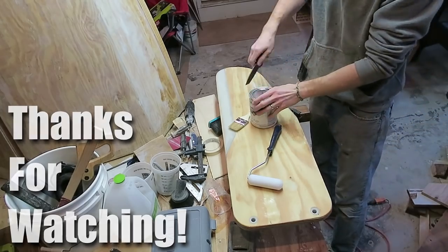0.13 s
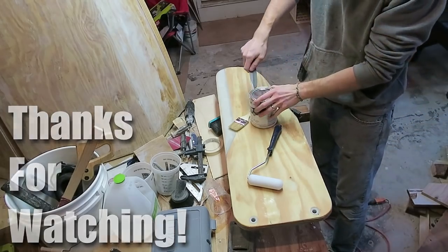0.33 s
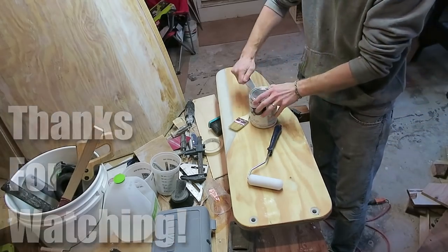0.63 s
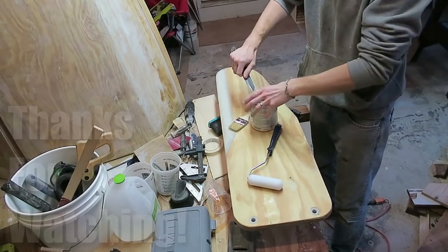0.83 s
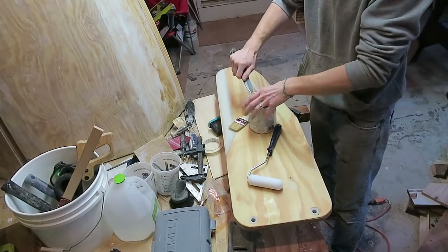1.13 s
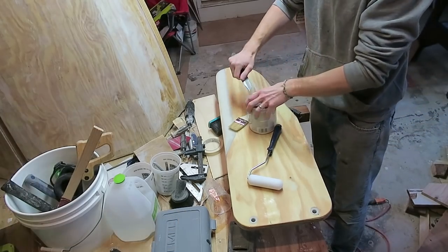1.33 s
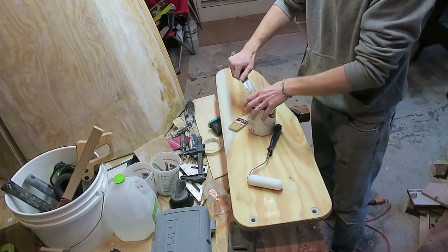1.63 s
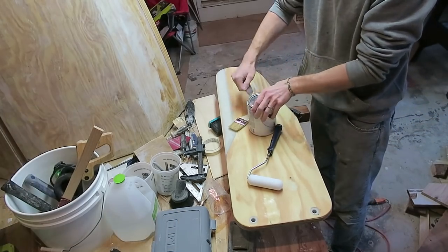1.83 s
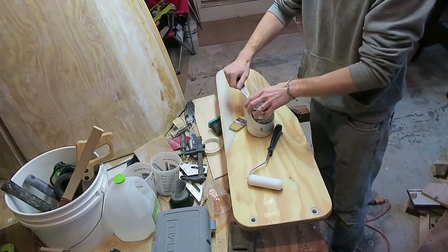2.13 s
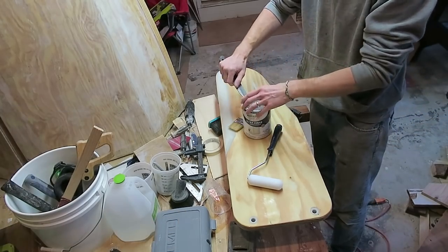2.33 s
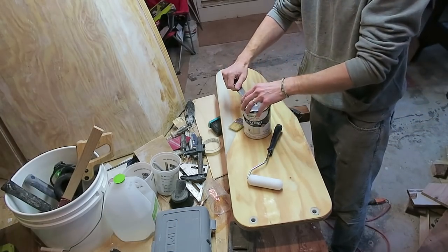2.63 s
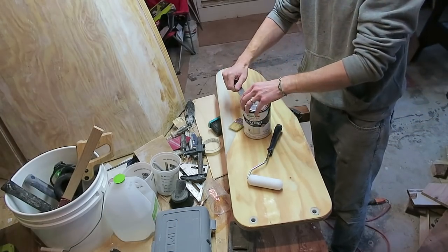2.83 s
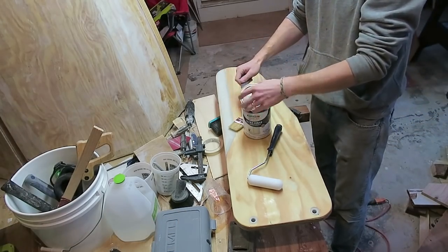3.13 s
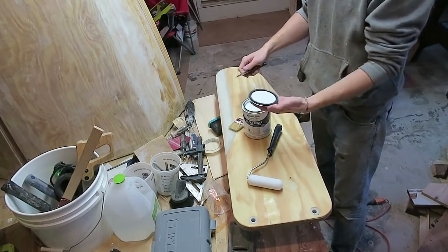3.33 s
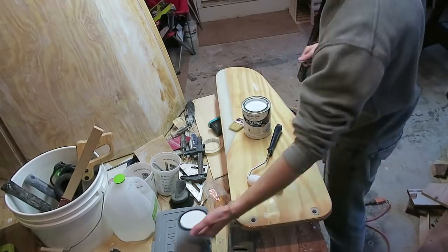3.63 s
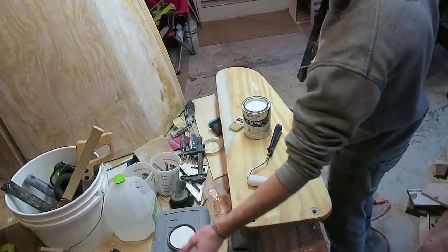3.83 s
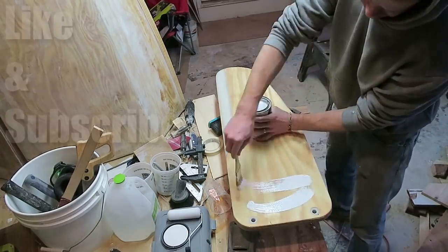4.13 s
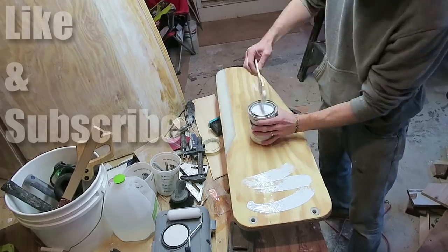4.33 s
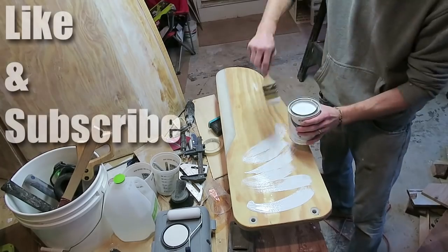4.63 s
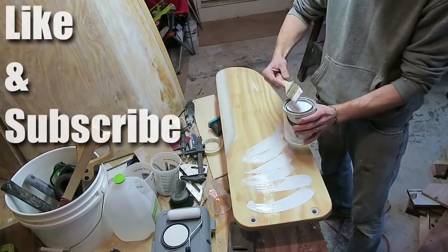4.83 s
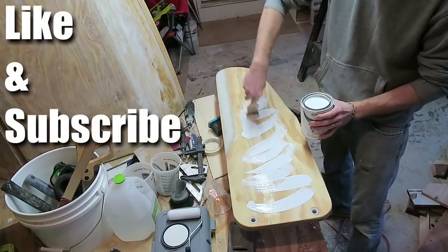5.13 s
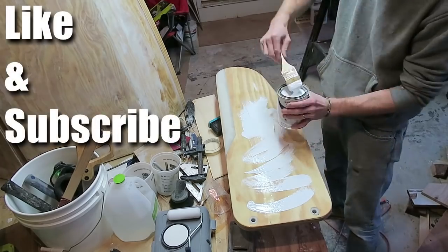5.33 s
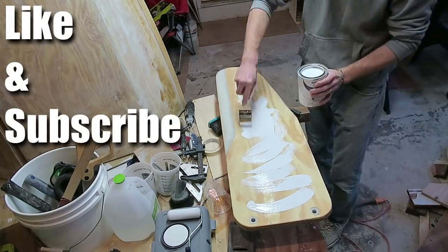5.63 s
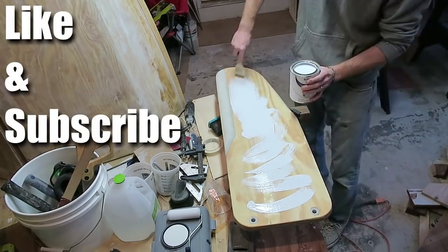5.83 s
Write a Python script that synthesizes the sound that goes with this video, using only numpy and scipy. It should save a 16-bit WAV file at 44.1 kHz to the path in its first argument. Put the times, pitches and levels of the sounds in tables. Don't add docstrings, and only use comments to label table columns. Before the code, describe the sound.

In a small workshop, a steel blade works round a paint tin on a plywood bench, sped up so the knocks swell softly, with squeaks and rasps. After a quieter gap the lid drops on a plastic case with a very loud crack, bounces and rings briefly. A cut, then faint brushing. Close stereo microphone, low room noise and thin high whine.

```python
import sys
import numpy as np
from scipy import signal
from scipy.fft import rfft, irfft, next_fast_len
from scipy.io import wavfile
from scipy.ndimage import uniform_filter1d

SR = 44100
rng = np.random.default_rng(int(sys.argv[2]) if len(sys.argv) > 2 else 0)


def log_audio(samples):
    frames = np.atleast_2d(samples).T
    limited = np.clip(frames, -1, 1)
    pcm = np.round(limited * 32767).astype(np.int16)
    wavfile.write(sys.argv[1], SR, pcm)


def gain_from_db(level_db):
    decades = np.asarray(level_db, float) / 20
    return 10 ** decades


N = 263256
PAD = next_fast_len(N + SR)

# start_s, blade_db, rim_db, tip_db, favoured_rim_hz
PRISES = [(0.187, -49, -61, -62.5, 3710), (0.417, -44, -62, -54.5, 3720), (0.903, -36.5, -70, -81, 3700),
          (0.997, -44, -51.5, -63, 3800), (1.169, -48.5, -52.5, -67, 3580),
          (1.305, -37.5, -41.5, -49.5, 3830), (1.572, -41, -52, -59, 3800),
          (1.738, -53.5, -61, -72.5, 3420), (1.87, -38.5, -37.5, -47, 3785), (1.964, -51.5, -68, -76, 3290),
          (2.042, -54, -42, -58.5, 3760), (2.137, -61, -57, -69, 3690), (2.171, -71, -64, -73, 3300),
          (2.222, -64, -59.5, -71, 3170), (2.297, -56, -51.5, -66, 3530), (2.37, -57, -54, -66, 3720),
          (2.431, -52, -45.5, -58.5, 3660), (2.481, -60, -42.5, -47.5, 3850),
          (5.907, -49, -69, -66.5, 3800)]
# start_s, case_db, lid_ring_db, crack_db, contact_hz
LANDINGS = [
    (3.8335, -3.5, -24, -5, 14000),
    (3.8368, -16, -24, -32, 7000),
    (3.9342, -14, -22, -24, 9000),
    (3.935, -7.5, -22, -22, 9000),
    (3.939, -26, -15, -40, 9000),
    (3.9715, -23, -27, -42, 5000),
    (3.9745, -15, -25, -34, 7000),
]
# start_s, old_scene_db, new_scene_db
CUT = [
    (0, 0, 0),
    (4.08445, 0, 0),
    (4.0845, -24, -22),
    (4.1, -60, -30),
    (4.11, -90, -24),
    (4.14, -120, 0),
    (6, -120, 0),
]
# low_hz, high_hz
GAP_HZ = [12750, 13300]


def rms_one(x):
    return x / np.sqrt(np.mean(x ** 2) + 1e-20)


def in_time(rows):
    s, *columns = np.transpose(rows)
    t = np.arange(N) / SR
    return [np.interp(t, s, column, left=-150, right=-150) for column in columns]


def at_hz(points, hz):
    known_hz, value = np.array(points)[:, 0], np.array(points)[:, 1]
    return np.interp(np.log(hz), np.log(known_hz), value)


def colour(x, points):
    hz = np.arange(PAD // 2 + 1) * SR / PAD + 1
    return irfft(rfft(x, PAD) * gain_from_db(at_hz(points, hz)), PAD)[..., :x.shape[-1]]


def swell(s, level_db, rise_ms, fall_ms, sharp=0.97):
    power = np.zeros(N)
    for at, db, rise, fall in zip(s, level_db, rise_ms, fall_ms):
        i = np.arange(max(int((at - .2) * SR), 0), min(int((at + .2) * SR), N))
        late_ms = (i / SR - at) * 1000
        distance = np.abs(late_ms / np.where(late_ms < 0, rise, fall))
        power[i] += gain_from_db(db - 6 * distance ** sharp) ** 2
    return np.sqrt(power)


def wander(hz, width_hz):
    step = np.sqrt(2 * np.pi * width_hz / SR) * rng.standard_normal(N)
    drift = uniform_filter1d(np.cumsum(step), size=max(int(SR / width_hz / 4), 1))
    return np.sqrt(2) * np.cos(2 * np.pi * hz * np.arange(N) / SR + drift)


def body(modes):
    return rms_one(sum(gain_from_db(db) * wander(hz, width) for hz, width, db in modes))


def cluster(hz, width_hz):
    r = np.exp(-np.pi * width_hz / SR)
    resonance = [1, 0, -1, 1, -2 * r * np.cos(2 * np.pi * hz / SR), r * r]
    return rms_one(signal.sosfilt([resonance, resonance], rng.standard_normal(N)))


def grains(spectrum, per_s, size_db):
    present = rng.random(N) < per_s / SR
    size = gain_from_db(size_db * np.minimum(rng.exponential(1, N), 4))
    return rms_one(colour(present * size * rng.choice([-1, 1], N), spectrum))


def tones(rows, width_hz):
    t, out = np.arange(N) / SR, np.zeros(N)
    drift = signal.hilbert(wander(SR / 8, width_hz)) * np.exp(-2j * np.pi * t * SR / 8)
    for s, db, smear, hz in rows:
        gain = swell([s], [db], [smear], [smear])
        i = gain > 0
        out[i] += gain[i] * np.real(drift[i] * np.exp(2j * np.pi * hz * t[i]))
    return out


def tin():
    # start_s, level_db, smear_ms, upper_modes_db, loudest_mode_hz
    knocks = [(0.19, -47, 11, -4.5, 786), (0.421, -35, 4.6, -3, 860), (0.466, -43.5, 22, -7, 280.5),
              (0.756, -43.5, 7.6, -17, 580), (0.911, -21.5, 9.9, -1.5, 497), (1.003, -39.5, 20, -5.5, 750),
              (1.19, -51, 23, -6, 457), (1.305, -37, 5.7, -4, 800), (1.318, -39.5, 14.5, -8, 305.5),
              (1.331, -35, 6.9, -5, 1060), (1.45, -49, 12, -3, 872), (1.573, -43.5, 6.1, 0, 775),
              (1.9, -40, 10, -7, 431), (2.044, -45, 12, -1.5, 851), (.52, -49.5, 7, -5, 900),
              (1.494, -43.5, 19, -4, 309), (1.599, -40, 14.4, -7.5, 288.2), (1.776, -54.5, 33, -5, 1028),
              (1.874, -35, 6, -5.5, 860), (1.967, -47.5, 13, -4, 297.4), (2.09, -43, 12, -7, 431),
              (2.14, -44.5, 6.8, -0.5, 739), (2.177, -43.5, 10, -6, 494), (2.227, -45.5, 7.5, -1, 775),
              (2.293, -48, 23, -5, 1070), (2.372, -45, 12, -4, 730), (2.434, -35, 7.8, -2, 474),
              (2.487, -37, 10.4, -1.5, 290.3), (3.658, -49, 11, -7, 530), (4.243, -55, 20, -6, 287.7),
              (5.909, -50, 11, -1.5, 1440)]
    # pitch_hz, width_hz, level_db
    low_modes = [(210, 16, 0), (304, 30.2, 4), (398, 20, -7.5), (438, 39.8, 6), (510, 46.9, 4),
                 (626, 29.7, 0.5)]
    high_modes = [(739, 54.1, 1.5), (860, 54, 1.5), (1051, 47.9, 1), (1095, 41.3, -5), (1275, 19.5, -10),
                  (1360, 32, -46), (1728, 55.5, -6.5)]
    s, db, smear, upper_db, hz = np.transpose(knocks)
    low_share = np.clip(1 - gain_from_db(np.minimum(upper_db, 0)) ** 2, .02, 1)
    low_db = db + 10 * np.log10(low_share)
    low = swell(s, low_db - 3.0, smear, smear) * body(low_modes)
    high = swell(s, db + upper_db - 1.5, smear, smear) * body(high_modes)
    return low + high + tones(zip(s, db - 5.5, smear, hz), width_hz=24.14)


def blade():
    # pitch_hz, width_hz, level_db
    blade_modes = [(2014, 93, 26.6), (2170, 83, 20.2), (2490, 170, 8.1)]
    rim_modes = [(3410, 105, 11.4), (3674, 98.4, 14.9), (3920, 99, 13.7)]
    tip_modes = [(4760, 200, -14), (5400, 300, -6), (6110, 500, 4.5), (6850, 200, -9), (8780, 350, -9),
                 (10440, 400, -12.5), (11240, 300, -8.5), (11910, 250, -10), (14100, 400, -23)]
    # pitch_hz, density_db_per_hz
    crackle = [(1500, -32), (3000, -1), (5000, -5.5), (8000, -17), (13000, -23), (14300, -26), (15600, -45)]
    s, blade_db, rim_db, tip_db, rim_hz = np.transpose(PRISES)
    softness = np.minimum(np.exp(-0.02 * (tip_db + 60)), 1.2)
    rise_ms, fall_ms = 6.9 * softness, 8.2 * softness
    out = swell(s, tip_db - 1.0, 1.8 * rise_ms, 2.74 * fall_ms) * grains(crackle, 16000, 2.2)
    out = out + tones(zip(s, rim_db - 3.5, rise_ms, rim_hz), width_hz=70)
    parts = (
        (blade_modes, blade_db - 27.5, wander, 1),
        (rim_modes, rim_db - 23, cluster, 1.18),
        (tip_modes, tip_db - 8, cluster, 1.18),
    )
    for modes, level_db, voice, stretch in parts:
        chance_db = 2 * rng.standard_normal((len(s), len(modes)))
        for k, (hz, width, db) in enumerate(modes):
            gain = swell(s, level_db + db + chance_db[:, k], stretch * rise_ms, stretch * fall_ms)
            out = out + gain * voice(hz, width)
    return out


def lid_rings():
    # start_s, level_db, smear_ms, pitch_hz
    rings = [(.49, -68, 41, 2170), (3.655, -59, 7.9, 1486), (.551, -56.5, 20, 195.5), (.57, -56.5, 31, 300),
             (.905, -39, 11.4, 2740), (2.06, -47, 14, 2070), (2.285, -56.5, 57, 210),
             (2.371, -49, 5.2, 3430), (.188, -47, 8.7, 2140), (.419, -42.5, 8.4, 2140),
             (.993, -45, 7.4, 2170), (.19, -64, 10, 5500), (1.165, -73, 10, 5400), (1.495, -51, 10, 2003),
             (2.043, -64, 10, 5620), (2.175, -68, 10, 5300), (2.175, -73, 12, 6860),
             (2.232, -75, 6.9, 6300), (2.37, -68, 14, 5560), (2.225, -60, 8, 2595), (1.963, -62, 10, 3300),
             (2.483, -52, 7.2, 4800), (2.485, -61, 10, 7000), (5.521, -72.5, 6, 4960), (.84, -58, 30, 2030),
             (.905, -40, 10, 1240), (2.49, -40, 6.3, 2490), (2.6, -58, 19, 950), (2.648, -65.5, 28, 1327),
             (2.875, -63, 4.1, 3260), (4.51, -72, 15, 3050), (5.908, -46, 7.3, 1660)]
    # pitch_hz, level_db
    chime = [(1157, -55), (2487, -61), (3284, -63), (4167, -60), (4970, -69)]
    lift_s, lift_ms = 3.045, 6
    lifted = [(lift_s, db, lift_ms, hz) for hz, db in chime]
    return tones(rings + lifted, width_hz=60.5)


def bench():
    # start_s, level_db, smear_ms
    thumps = [(0.146, -59, 33), (0.688, -46.5, 14.4), (0.926, -35.5, 27), (1.095, -50.5, 37),
              (1.316, -51, 36), (1.441, -45, 15), (1.569, -46, 39), (1.708, -55, 24), (1.816, -51, 9.8),
              (1.902, -49.5, 52), (2.164, -50.5, 33), (2.493, -48, 38), (2.981, -57, 17), (3.1, -59, 30),
              (4.144, -54, 14), (4.241, -51, 20), (4.412, -56.5, 21)]
    bench_hz = 131.5
    return tones([row + (bench_hz,) for row in thumps], width_hz=22)


def rubbing():
    # start_s, rasp_db, build_up_ms, release_ms, brightness_db
    drags = [(0.53, -74.5, 29, 85, -14.5), (0.62, -67.5, 65, 47, 7.5), (0.87, -54.5, 45, 20, 0.5),
             (0.909, -38.5, 13.6, 14, -15), (1.216, -55.5, 35, 21, -1.5), (1.499, -52, 48, 21, -2),
             (1.771, -53.5, 39, 26, -1), (2.07, -56.5, 23, 28, -4.5), (2.165, -62, 22, 18, 8.5),
             (2.36, -55.5, 78, 28, 1), (2.49, -62, 24, 18, 18), (2.9, -68, 49, 74, 4.5),
             (3.08, -71.5, 45, 59, -3), (3.46, -68.5, 56, 62, 7.5), (3.72, -75.5, 230, 400, -4)]
    # pitch_hz, density_db_per_hz
    rasp = [(900, -30.5), (1900, 12), (2900, 8), (3700, 0), (4500, -16), (6500, -45), (12000, -67)]
    dull = [(250, -16.5), (500, -3), (1100, 0.5), (1700, -0.5), (2300, -7), (4000, -66)]
    keen = [(3000, -26.5), (3900, 5.5), (4700, 1), (5600, -10.5), (8000, -25.5), (12000, -31)]
    sharp = 1.53
    s, blade_db, rim_db, *_ = np.transpose(PRISES)
    slips = [(at, db - 13, 15, 24.3, 3) for at, db in zip(s, np.maximum(blade_db, rim_db))]
    s, db, rise, fall, bright_db = np.hstack([np.transpose(slips), np.transpose(drags)])
    dull_db = db + 4.5 - 0.63 * bright_db
    keen_db = db - 9 + bright_db
    return (swell(s, db + 3.0, rise, fall, sharp) * grains(rasp, 4000, 5.7)
            + swell(s, dull_db, rise, fall, sharp) * grains(dull, 5000, 4.5)
            + swell(s, keen_db, rise, fall, sharp) * grains(keen, 4600, 1.5))


def brush():
    # start_s, sweep_db, smear_ms, bristle_hiss_db
    strokes = [(4.232, -55.5, 18.6, -24), (4.28, -66, 36, -5), (4.309, -58.5, 25, -23),
               (4.42, -62.5, 31, -16), (4.5, -66.5, 40, -19), (4.62, -63, 40, -21), (4.71, -63.5, 41, -6.5),
               (4.82, -72, 20, -20), (4.92, -72, 34, -18), (5.08, -63.5, 33, -20), (5.15, -66.5, 65, -7),
               (5.195, -60.5, 30, -22), (5.28, -66, 31, -3.5), (5.38, -72.5, 55, -13),
               (5.521, -69, 29, -11), (5.665, -61, 62, -17.5), (5.81, -70, 75, -5),
               (5.909, -50, 18.6, -12.5), (5.975, -61, 12, -12)]
    # pitch_hz, density_db_per_hz
    sweep = [(290, -47), (500, -1), (626, -15), (1120, -1), (1450, -1), (1580, 0.5), (4010, -4.5),
             (6500, -19), (8450, -63), (14300, -120)]
    hiss = [(4000, 2.5), (6000, 3), (9000, -3.5), (12500, -5), (14500, -14), (16000, -40)]
    sharp = 2.5
    s, db, smear, hiss_db = np.transpose(strokes)
    return (swell(s, db + 0.73, smear, smear, sharp) * grains(sweep, 9000, 2.1)
            + swell(s, db + hiss_db - 0.5, smear, smear, sharp) * grains(hiss, 14000, 2.1))


def strike(modes, column, sign=-1):
    out = np.zeros(N)
    for row in LANDINGS:
        start_s, contact_hz = row[0], row[-1]
        click = np.zeros(SR // 2) + 1e-18
        click[0] = gain_from_db(row[column])
        click = signal.sosfilt(signal.butter(3, min(contact_hz, 18000), fs=SR, output="sos"), click)
        for k, (hz, db, t60) in enumerate(modes):
            delay_s = rng.random() * (2200 / contact_hz) ** 2 * .004
            at = round((start_s + delay_s) * SR)
            r, w = gain_from_db(-60 / (t60 * SR)), 2 * np.pi * hz / SR
            ring = signal.lfilter([0, np.sin(w)], [1, -2 * r * np.cos(w), r * r], click)
            out[at:at + len(ring)] += sign ** k * gain_from_db(db + rng.normal(0, 1)) * ring
    return out


def shimmer(count=40):
    # lowest_hz, highest_hz
    span_hz = [5200, 15200]
    place, size, ring = rng.random((3, count))
    hz = span_hz[0] * (span_hz[1] / span_hz[0]) ** place
    level_db = -24.5 - 12.5 * place - 12 * size
    t60_s = .09 * (.4 + 1.5 * ring)
    return list(zip(hz, level_db, t60_s))


def workshop(x):
    # pitch_hz, t60_s
    decay = [(100, 0.12), (300, 1), (1000, 0.27), (3000, 0.39), (8000, 0.35)]
    t, edges, tail = np.arange(SR // 2) / SR, 60 * 2 ** np.arange(9.), 0
    for low, high in zip(edges, edges[1:]):
        octave = signal.butter(2, [low, high], "band", fs=SR, output="sos")
        band = signal.sosfilt(octave, rng.standard_normal(len(t)))
        tail = tail + band * gain_from_db(-60 * t / at_hz(decay, np.sqrt(low * high)))
    tail = tail * np.clip(t / .004, 0, 1)
    return signal.fftconvolve(x, tail / np.sqrt(np.sum(tail ** 2)))[:len(x)]


def lid_drop():
    # pitch_hz, level_db, t60_s
    thud_modes = [(177, 3, .085), (246, -6, .11), (340, -12, .05), (410, -9, .045), (510, -14, .05),
                  (650, -11, .05), (880, -11, .05), (1080, -13, .04)]
    case_modes = [(1302, -10.5, 0.036), (1394, -5.5, 0.034), (1558, -1.5, 0.024), (2193, -1, 0.015),
                  (2710, -3.5, 0.016)]
    crack_modes = [(6900, -1, .0022), (11000, -19, .002)]
    lid_hz = [2050, 2163, 2460, 2816, 3230, 3690, 4050, 4500, 4900, 6740, 9200, 10060, 10750, 11860]
    # level_db, t60_s
    lid_decay = [(-14, 0.14), (-14.5, .2), (-9, .22), (-16, 0.073), (1, .11), (-18, .03), (-11.5, .12),
                 (-15.5, 0.06), (-19, 0.071), (-20, 0.024), (-33, .1), (-27, 0.14), (-32, .1), (-26.5, .11)]
    # pitch_hz, density_db_per_hz
    clatter = [(60, -22), (110, -3.5), (170, 1), (450, -15), (700, -8), (1500, -4), (1850, -9), (3200, -8),
               (3700, -15), (7000, -26.5), (8600, -44), (13000, -69.5)]
    # pitch_hz, level_db
    shop_colour = [(80, -14.5), (180, -4), (500, -6), (1500, -0.5), (3500, 1), (7000, -8), (12000, -25.5)]
    # pitch_hz, side_minus_mid_db
    drop_spread = [(60, -17), (110, -23), (200, -25), (380, -15), (700, -17), (1290, -21), (2380, -20),
                   (4400, -10), (8120, -5.5), (15000, -7)]

    lid_modes = [(hz, db, t60) for hz, (db, t60) in zip(lid_hz, lid_decay)] + shimmer()
    high_pass = signal.butter(2, 1000, "high", fs=SR, output="sos")
    clack = signal.sosfilt(high_pass, strike(case_modes, column=1, sign=0.99))
    thud = gain_from_db(-10) * strike(thud_modes, column=1)
    hit = thud + clack + strike(lid_modes, column=2) + strike(crack_modes, column=3)

    blows = np.zeros(N)
    blows[[round(row[0] * SR) for row in LANDINGS]] = [gain_from_db(row[1]) for row in LANDINGS]

    def answer():
        wash = gain_from_db(26) * colour(workshop(blows), clatter)
        return wash + gain_from_db(-16) * colour(workshop(hit), shop_colour)

    mid, other = answer(), answer()
    quarter_cycle = signal.hilbert(hit, PAD).imag[:N]
    side = colour(quarter_cycle + other, drop_spread)
    left_db = .4
    pair = np.array([hit + mid + side, hit + mid - side]) * gain_from_db(np.array([[left_db / 2], [-left_db / 2]]))
    return signal.sosfilt(signal.butter(4, 100, "high", fs=SR, output="sos"), pair)


def spread(mid):
    # pitch_hz, side_minus_mid_db
    width = [(60, -19.5), (110, -27.5), (200, -8.5), (380, -17.5), (700, -16.5), (1290, -28), (2380, -26.5),
             (4400, -14.5), (8120, 2.5), (15000, -9.5)]
    t = np.arange(1, SR // 50) / SR
    half = rng.standard_normal(len(t)) * gain_from_db(-60 * t / 0.017)
    scatter = np.concatenate([-half[::-1], [0], half])
    scatter = scatter / np.sqrt(np.sum(scatter ** 2))
    side = colour(signal.fftconvolve(mid, scatter, "same"), width)
    return np.array([mid + side, mid - side])


def room_floor():
    # pitch_hz, density_db_per_hz
    floor = [(12, -28), (20, -3), (82, -0.5), (157, -2.5), (285, 2), (439, -2.5), (490, -0.5), (561, -8),
             (735, -5.5), (889, -9.5), (4280, -22), (12000, -39.5), (13000, -37)]
    # pitch_hz, left_right_likeness (1 = same)
    likeness = [(60, 0.8), (130, 0.6), (290, -0.38), (640, -0.16), (1410, -0.098), (3100, 0.35),
                (6820, 0.71), (15000, 0.73)]
    whine_hz, whine_width_hz = 13580, 450
    mid, side, whine = rng.standard_normal((3, N))
    share = [(hz, np.clip(alike, -.95, .95)) for hz, alike in likeness]
    mid = colour(colour(mid, floor), [(hz, 10 * np.log10(1 + a)) for hz, a in share])
    side = colour(colour(side, floor), [(hz, 10 * np.log10(1 - a)) for hz, a in share])
    band = [whine_hz - whine_width_hz / 2, whine_hz + whine_width_hz / 2]
    whine = rms_one(signal.sosfilt(signal.butter(2, band, "band", fs=SR, output="sos"), whine))
    low_pass = signal.butter(10, GAP_HZ[1], fs=SR, output="sos")
    air = signal.sosfilt(low_pass, np.array([mid + side, mid - side]))
    return gain_from_db(-60.5) * air / np.std(mid) + gain_from_db(-86) * whine


def scene():
    old_db, new_db = in_time(CUT)
    handling = tin() + blade() + lid_rings() + bench() + rubbing() + brush()
    return spread(handling) + lid_drop() * gain_from_db(old_db - new_db) + room_floor()


def top_cut(x):
    return signal.sosfilt(signal.butter(12, 16470, fs=SR, output="sos"), x)


def record(dry):
    top = signal.butter(6, 15000, fs=SR, output="sos")
    gap = signal.butter(3, GAP_HZ, "bandstop", fs=SR, output="sos")
    heard = signal.sosfilt(gap, signal.sosfilt(top, dry)) * gain_from_db(in_time(CUT)[1])
    mix = np.clip(heard, -1, 1)
    return top_cut(mix)


dry = scene()
out = record(dry)
log_audio(out)
```